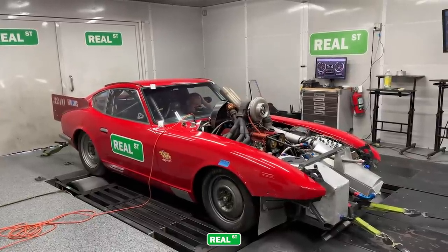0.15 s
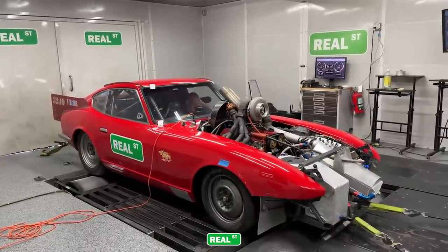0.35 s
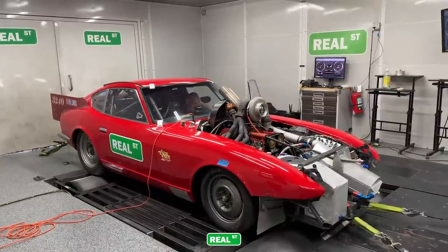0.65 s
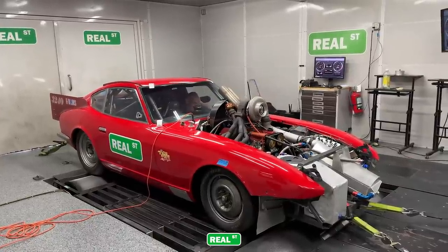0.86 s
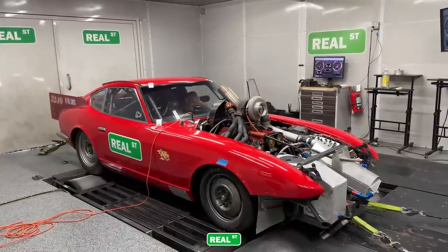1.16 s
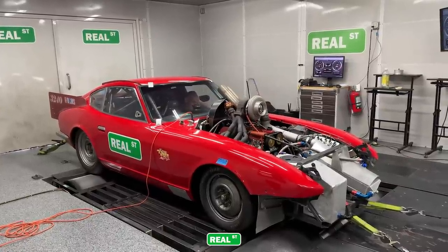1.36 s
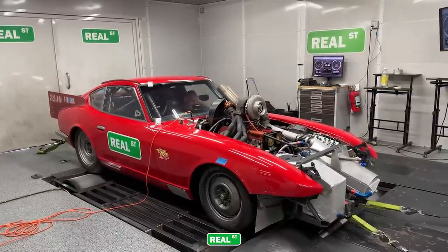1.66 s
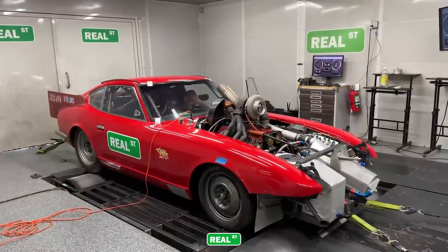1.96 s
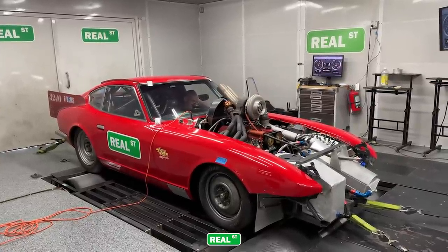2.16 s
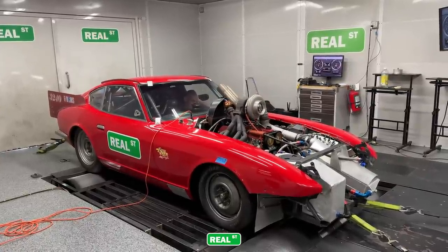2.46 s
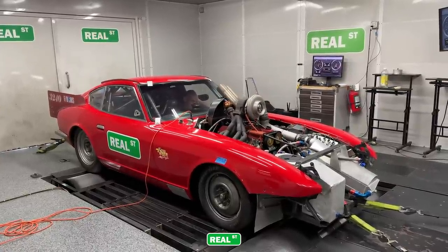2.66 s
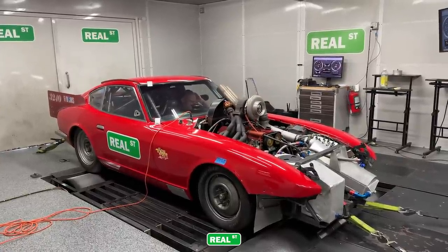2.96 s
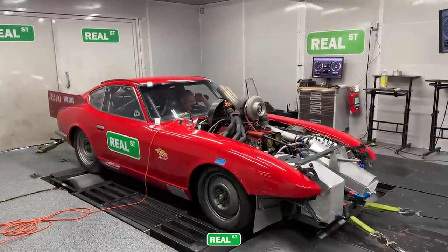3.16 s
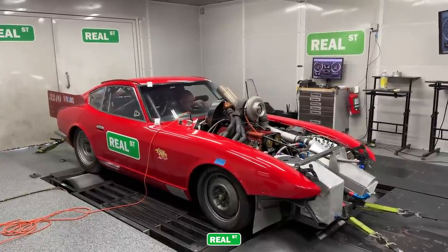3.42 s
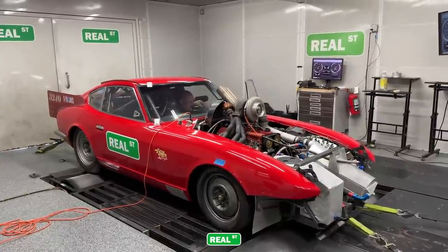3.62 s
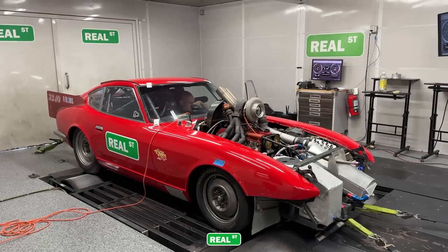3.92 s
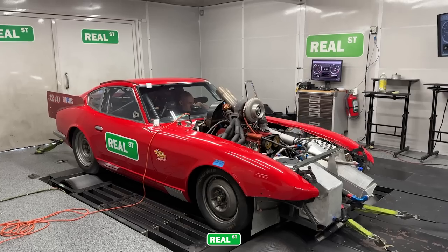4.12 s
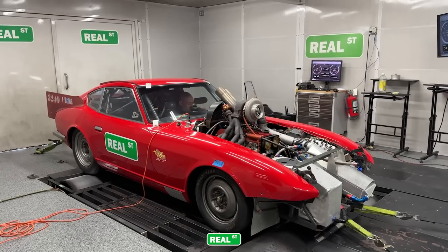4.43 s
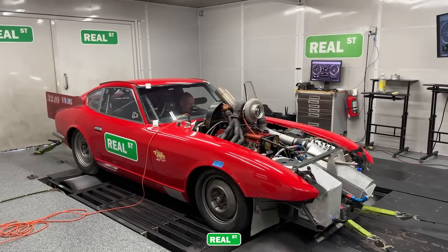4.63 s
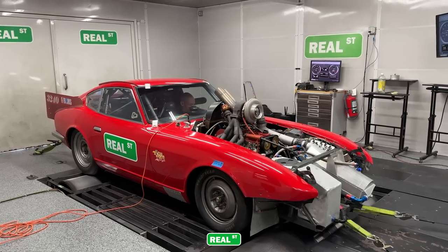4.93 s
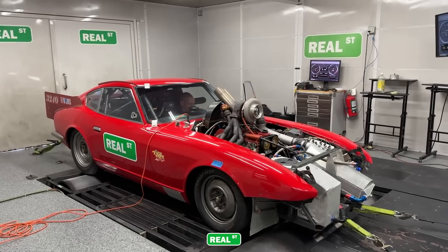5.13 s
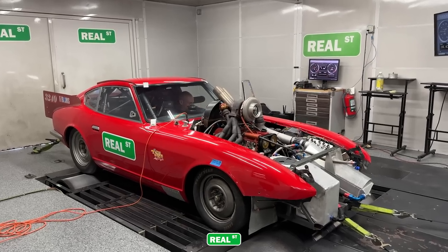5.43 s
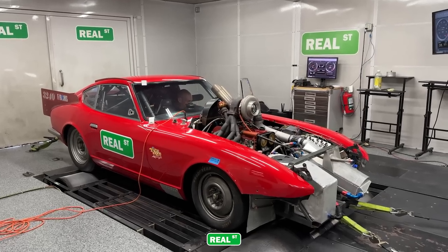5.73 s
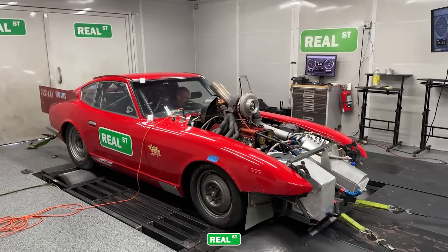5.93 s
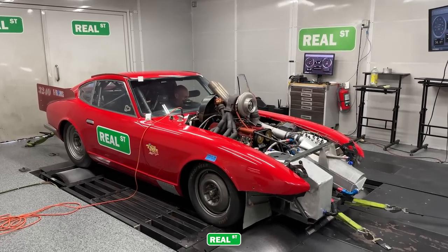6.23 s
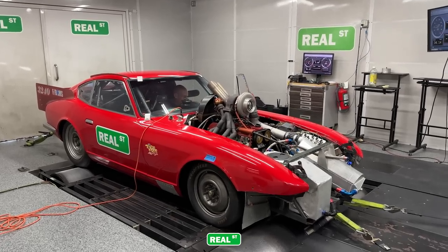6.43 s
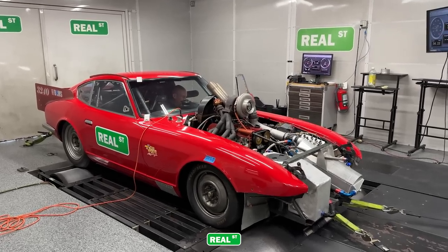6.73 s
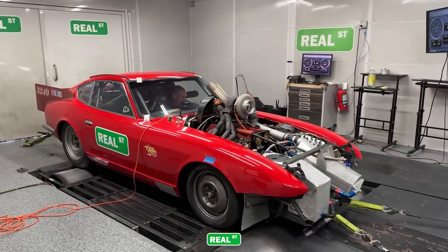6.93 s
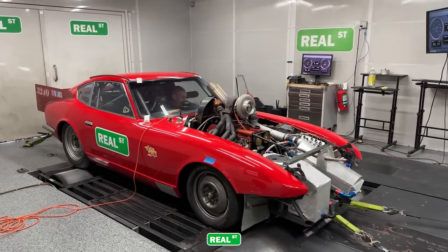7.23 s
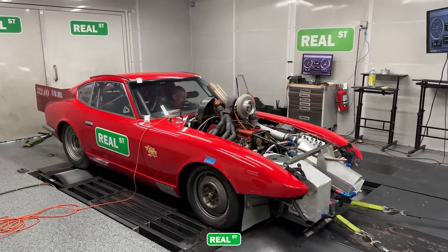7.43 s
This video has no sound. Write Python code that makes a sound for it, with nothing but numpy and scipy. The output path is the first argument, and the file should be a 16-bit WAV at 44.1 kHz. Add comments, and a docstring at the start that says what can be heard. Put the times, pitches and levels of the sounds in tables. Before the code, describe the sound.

A turbocharged straight-six car is held on rollers in a hard, reflective workshop, heard in stereo from nearby. At 0 seconds the engine is already running, with a low buzzing firing tone around 83 Hz beneath loud roar and bright, airy intake hiss. The pitch climbs quickly to about 114 Hz by 1.4 seconds, its harmonics swelling and sinking as they cross exhaust and room resonances. The hiss drops markedly by 2.3 seconds, briefly recovers a little, then thins again after 3. The rise slows, approaching 139 Hz by the end. Uneven cylinder growl and fine valve clatter keep the drone rough. From about 3.2 seconds a faint, wavering two-tone whine fades in and slides downward. After 5.4 seconds the exhaust beat softens and the air recedes further, leaving a smoother steady drone until 7.6 seconds, with no shutdown.

```python
"""A straight-six's firing tone climbs and levels off: a turbocharged car on a dyno in a hard-walled workshop.
Four harmonics sweep through resonances of exhaust and room; weaker lines from unequal cylinders lie between.
Coloured noise makes the gas and rollers roar under the car and the open turbo intake hiss less and less.
Pulse harmonics, a weave of faint lines and valve clatter roughen the beat; later a faint two-tone whine sinks.
Two microphones hear it all; the engine's tones reach the right one slightly late."""
import sys
import numpy as np
from scipy import signal
from scipy.fft import rfft, irfft, next_fast_len
from scipy.io import wavfile
from scipy.ndimage import uniform_filter1d

SR = 44100
rng = np.random.default_rng(int(sys.argv[2]) if len(sys.argv) > 2 else 0)


def dump_mix(stems):
    """Bounce the given channels to the path in sys.argv[1] as a 16-bit WAV at rate SR."""
    frames = np.atleast_2d(stems).T  # one column per channel
    limited = np.clip(frames, -1, 1)  # hard clip at full scale
    pcm = np.round(limited * 32767).astype(np.int16)
    wavfile.write(sys.argv[1], SR, pcm)


N = 334278

RIGHT_LAG_S = 0.00025  # engine tones reach the right microphone this much later

# noise balance of the two microphones: f/Hz, left over right/dB
MIC_BALANCE = [(60, -5), (300, 1), (700, 7.5), (950, 3.5), (1200, -3), (1650, 1.5), (1950, -6.5),
               (2600, -2), (3200, -2.5), (5500, 0), (7000, -2), (8100, -7), (11000, -0.5)]
# gain of the tailpipe for upper harmonics and whine: f/Hz, gain/dB
TAILPIPE_GAIN = [(400, -1), (480, -3), (600, 1.5), (700, -1), (760, -4), (850, 3), (960, 2), (1040, -4.5),
                 (1350, -6.5), (1700, -23)]
# spectrum of the roar under the car: f/Hz, relative density/dB
ROAR_SPECTRUM = [(300, -10.5), (480, -10), (640, -0.5), (760, -5), (900, -1), (1030, -8), (1150, -3.5),
                 (1400, -11.5), (1700, -8), (2300, -33)]
# resonances under the car: f/Hz, width/Hz, boost/dB
CAVITY_RESONANCES = [(704, 29, 3), (842, 37, 6), (925, 25, 5), (966, 39, 10.5), (1127, 31, 7.5),
                     (1330, 74, 4)]


def from_db(db):
    """Amplitude factor of a level in dB."""
    return 10 ** (np.asarray(db) / 20)


def rms_one(x):
    """Scale to an rms of 1, over all channels together."""
    return x / np.sqrt(np.mean(x ** 2) + 1e-20)


def in_time(rows):
    """Each column of a curve, at every sample."""
    s, *columns = np.transpose(rows)
    return [np.interp(np.arange(N) / SR, s, c) for c in columns]


def at_hz(points, hz):
    """A spectrum read on a log-frequency axis."""
    where, value = np.transpose(points)
    return np.interp(np.log(hz + 1e-3), np.log(where), value)


def bell(hz, centre, width):
    """The shape of a resonance or node: 1 at its centre, a half at half a width to either side."""
    return 1 / (1 + (2 * (hz - centre) / width) ** 2)


def panned(balance_db):
    """Left and right gains for a level difference."""
    return np.array([from_db(balance_db / 2), from_db(-balance_db / 2)]).reshape(2, -1)


def drift(rate_hz):
    """Slow chance with a spread of 1: noise through two equal low-pass poles."""
    step = 40  # samples between drawn values
    warm_up = 2000
    pole = np.exp(-2 * np.pi * rate_hz * step / SR)
    noise = rng.standard_normal(N // step + 2 + warm_up)
    slow = signal.lfilter([1], [1, -2 * pole, pole * pole], noise)[warm_up:]
    return np.interp(np.arange(N) / step, np.arange(len(slow)), rms_one(slow))


def crank(firing_hz, wobble):
    """Angle of the four-stroke cycle (six firings per 2 pi); combustion makes the speed waver."""
    cycle_hz = firing_hz / 6 * (1 + wobble * drift(14))
    return 2 * np.pi * np.cumsum(cycle_hz) / SR


def firing_tones(angle, firing_hz, throttle_db, rough, boom_hz, boom_width_hz):
    """The exhaust beat: four clean harmonics sweep through one response of pipe and room."""
    # multiple of the firing rate, level/dB, share of the throttle's swing followed
    harmonics = [(1, 1, 1.03), (2, -2.5, 1.65), (3, 0.5, 1.14), (4, -6, 1.03)]
    # gain of the exhaust for those harmonics: f/Hz, gain/dB
    pipe_gain = [(82, -13.5), (87, -8), (108.4, -11.5), (138.4, -8.5), (165, -29.5), (172.5, -19.5),
                 (238, -13.5), (281, -9.5), (301.5, -17), (361, -30.5), (378, -30), (400.5, -25),
                 (446, -22.5), (490.6, -32), (555, -28)]
    # side on which they are louder, away from the nodes: f/Hz, left over right/dB
    beat_balance = [(85, 3), (138, 3), (170, 7), (200, 5), (220, -4), (275, -1.5), (410, 1), (550, 3)]
    # room nodes in which a harmonic sinks: f/Hz, width/Hz, dip/dB, left over right/dB
    standing_waves = [(95.2, 9, -7, -0.5), (115.4, 2.6, -7, 6), (123.3, 20.4, -17, -2),
                      (206.2, 23.3, -10.5, -1), (259.9, 5.86, -15, -8.5), (265.9, 4.9, -5.5, 0),
                      (353, 11, -2.5, -3), (387.6, 9.9, -17.5, -7), (514.9, 20, -16.5, -4)]
    beat = 6 * angle - 2 * np.pi * firing_hz * RIGHT_LAG_S * np.array([[0], [1]])
    tones = 0
    for k, db, follows in harmonics:
        k = round(k)
        hz = k * firing_hz
        level_db = db + follows * throttle_db + at_hz(pipe_gain, hz)
        balance_db = at_hz(beat_balance, hz)
        for centre, width, dip_db, side_db in standing_waves:
            node = bell(hz, centre, width)
            level_db = level_db + dip_db * node
            balance_db = balance_db + side_db * node
        turn = np.arctan((hz - boom_hz) / boom_width_hz)  # the phase swings across the main resonance
        tones = tones - from_db(level_db) * panned(balance_db) * np.cos(k * beat - turn)
    return np.sqrt(2) * tones * (1 + rough * drift(25))


def engine_line(angle, firing_hz, order, db, rough):
    """One multiple of the cycle rate, unsteady in level and phase, later at the right microphone."""
    phase = order * angle + rng.uniform(0, 2 * np.pi) + rough * drift(2.5)
    lag = 2 * np.pi * order * firing_hz / 6 * RIGHT_LAG_S
    waves = np.cos(np.float32([phase, phase - lag]))
    return np.sqrt(2) * from_db(db) * (1 + rough * drift(3.3)) * waves


def cylinder_growl(angle, firing_hz, gain_db, rough):
    """No two cylinders fire alike: lines between the harmonics swell as they cross each resonance."""
    # gain of exhaust and room for these lines: f/Hz, gain/dB
    exhaust_gain = [(30, -73), (65, -44), (90, -40.5), (138, -33.5), (175, -47.5), (205, -53.5),
                    (235, -37.5), (260, -40), (290, -32.5), (320, -34), (375, -43), (520, -49), (900, -46),
                    (1300, -48)]
    # multiple of the cycle rate, level at low revs/dB, level at high revs/dB
    uneven_orders = [(2, -6, -6), (3, 2, 1.5), (4, -0.5, -1.5), (5, -9, -15.5), (7, -14, -13), (8, -8, 0.5),
                     (9, 2.5, -8.5), (10, -11, 4.5), (11, -8, -1), (13, -20, -4), (14, 1, 6.5),
                     (15, -3, -25), (16, -1, 2), (17, -26, -10), (19, 3.5, -10), (20, -11, 0.5),
                     (21, 2, -9), (22, -6, 3.5), (26, 0, -10), (28, -7, 3.5), (32, 0, -1.5), (38, 5, -12),
                     (40, -11, 4.5)]
    high = np.interp(firing_hz, [108, 124], [0, 1])  # the imbalance changes as the revs rise
    growl = 0
    for order, low_db, high_db in uneven_orders:
        order = round(order)
        db = at_hz(exhaust_gain, order * firing_hz / 6) + low_db + high * (high_db - low_db)
        growl = growl + engine_line(angle, firing_hz, order, db + gain_db, rough)
    return growl


def bark(angle, firing_hz, air_db, rough):
    """Sharp pulses add firing harmonics 5 to 13, strongest while much air flows."""
    bark_db = -37 + 0.7 * air_db
    lines = 0
    for k in range(5, 14):
        level_db = bark_db + at_hz(TAILPIPE_GAIN, k * firing_hz)
        lines = lines + engine_line(angle, firing_hz, 6 * k, level_db, rough)
    return lines * panned(0.86)


def exhaust_rattle(angle, air_db, change_hz):
    """The ragged six-pulse pattern returns each cycle, slowly changing: a weave of faint lines in the roar."""
    orders = np.arange(23, 59)  # multiples of the cycle rate
    turn = np.linspace(0, 2 * np.pi, 1024, endpoint=False)
    pulses = 0
    for _ in range(2):  # two patterns drift in and out
        start_phases = rng.uniform(0, 2 * np.pi, len(orders))
        pattern = np.cos(np.outer(turn, orders) + start_phases).sum(axis=1)
        pulses = pulses + np.interp(angle % (2 * np.pi), turn, pattern) * drift(change_hz)
    steady = pulses / np.sqrt(uniform_filter1d(pulses ** 2, size=4000) + 1e-3)  # level evened out

    size = next_fast_len(N)
    hz = np.arange(size // 2 + 1) * SR / size
    boost_db = sum(db * bell(hz, centre, width) for centre, width, db in CAVITY_RESONANCES)
    colour = from_db(at_hz(ROAR_SPECTRUM, hz) + boost_db) * panned(at_hz(MIC_BALANCE, hz))
    # the room brings each pitch to the two microphones in a phase of its own
    knots_hz = np.arange(100) * 20
    phase = np.array([np.interp(hz, knots_hz, np.cumsum(rng.normal(0, 1.2, 100))) for _ in range(2)])
    heard = irfft(rfft(steady, size) * colour * np.exp(1j * phase), size)[:, :N]
    return from_db(-35 + 0.37 * air_db) * rms_one(heard)


def room_noise(spectrum, resonances, echo_share):
    """Turbulence coloured by the resonances and by early wall echoes, at both microphones; rms 1."""
    # likeness of the two microphones: f/Hz, left-right correlation (-1 to 1)
    likeness = [(60, 0.85), (300, 0.89), (520, -0.52), (850, 1), (1100, 0.3), (1450, -0.62), (2000, -0.19),
                (2600, 0.45), (3250, 0.24), (3700, -0.13), (5600, -0.099), (6600, 0.6), (7200, -0.57),
                (9500, 0.33), (12000, 0.8)]
    size = next_fast_len(N)
    hz = np.arange(size // 2 + 1) * SR / size
    boost_db = sum(db * bell(hz, centre, width) for centre, width, db in resonances)
    source, diffuse = rfft(rng.standard_normal((2, size)))
    # dense echoes within 30 ms comb the spectrum with a fine, steady ripple
    taps = rng.standard_normal((2, int(.03 * SR)))
    front, walls = rfft(taps / np.sqrt(taps.shape[1]), size)
    mid = source * (1 + echo_share * front) / np.sqrt(1 + echo_share ** 2)
    # the side walls return the same sound differently to each microphone
    side = .5 * source * walls + np.sqrt(3) / 2 * diffuse
    alike = np.clip(at_hz(likeness, hz), -.99, .99)
    pair = np.sqrt(1 + alike) * mid + np.sqrt(1 - alike) * side * [[1], [-1]]
    colour = from_db(at_hz(spectrum, hz) + boost_db) * panned(at_hz(MIC_BALANCE, hz))
    return rms_one(irfft(pair * colour, size)[:, :N])


def valve_rasp(angle, level_db, depth, scatter_db):
    """The valve train: a short burst of clatter with every firing, each of its own strength."""
    # spectrum of the clatter: f/Hz, relative density/dB
    rasp_spectrum = [(1000, -15), (1750, -3), (2020, 3.5), (2230, -5.5), (2420, 2), (3000, -5.5),
                     (3450, -1.5), (4700, -5), (5500, -11.5), (6500, -4), (7150, -10), (7600, -5.5),
                     (11000, -27)]
    firings = 6 * angle / (2 * np.pi)
    strength = from_db(scatter_db * rng.standard_normal(N))[firings.astype(int)]
    bursts = rms_one(1 + depth * strength * np.exp(-3 * (firings % 1)))
    return from_db(level_db) * bursts * room_noise(rasp_spectrum, [], echo_share=1.0)


def rush(angle, air_db, throttle_db):
    """Exhaust rumble, roar under the car and intake air fall with the flow; strokes throb in roar and intake."""
    # spectra of exhaust rumble, intake hiss and its top: f/Hz, relative density/dB
    rumble_spectrum = [(15, -48), (30, -24), (50, -8), (70, 1.5), (110, -8.5), (170, -5), (240, -2.5),
                       (300, -0.5), (390, -9), (520, -7.5), (800, -46)]
    hiss_spectrum = [(1000, -19), (1370, 2.5), (1700, 3), (2000, -2.5), (2200, -0.5), (2450, 1.5),
                     (3600, -4), (4900, -2), (5400, -6), (6500, -13.5), (8000, -49)]
    spray_spectrum = [(4000, -25), (6000, -6), (6900, 4.5), (7550, -2), (8300, 2), (9500, -2.5),
                      (10300, -5), (11600, -9), (15000, -11), (17000, -41)]
    # resonances of the intake and its pipes: f/Hz, width/Hz, boost/dB
    intake_resonances = [(1318, 62, 9.5), (1523, 54, 6), (2365, 120, 4), (2590, 73, 2.5), (3060, 46, 3),
                         (3230, 210, 11), (3820, 140, 6.5), (4630, 400, 1), (6730, 190, 2.5),
                         (7970, 180, 3.5), (10500, 90, 6)]
    throb = 1 + .1 * np.cos(2 * angle) + .1 * np.cos(4 * angle)
    throb = throb + .06 * np.cos(6 * angle) + .09 * np.cos(12 * angle)
    gulp = 1 + .06 * np.cos(3 * angle) + .07 * np.cos(6 * angle)
    # level at 0 dB of flow, plus the share of the flow's swing that each follows
    rumble_db = -34.5 + 0.16 * air_db + 0.41 * throttle_db
    roar_db = -28.0 + 0.44 * air_db
    hiss_db = -23.5 + 1.036 * air_db + 1.24 * drift(20)
    spray_db = -24.5 + 1.237 * air_db + 1.15 * drift(49) + 0.5 * drift(5)
    rumble = from_db(rumble_db) * room_noise(rumble_spectrum, [], echo_share=0.13)
    roar = from_db(roar_db) * room_noise(ROAR_SPECTRUM, CAVITY_RESONANCES, echo_share=0.52) * throb
    hiss = from_db(hiss_db) * room_noise(hiss_spectrum, intake_resonances, echo_share=0.63)
    spray = from_db(spray_db) * room_noise(spray_spectrum, intake_resonances, echo_share=0.56)
    return rumble + roar + (hiss + spray) * gulp


def whine(upper_ratio, upper_db, waver):
    """Two faint unsteady tones sink together, likely the turbo's rotor slowing against air drag."""
    start_s, start_hz, fade_s = 3.2, 1286, 0.85
    drag_per_s = 0.142  # growth of the period per second
    coasting_s = np.maximum(np.arange(N) / SR - start_s, 0)
    hz = start_hz / (1 + drag_per_s * coasting_s)
    phase = 2 * np.pi * np.cumsum(hz * (1 + waver * drift(20.0))) / SR
    # the tailpipe swells them around 900 Hz
    lower_gain = from_db(at_hz(TAILPIPE_GAIN, hz))
    upper_gain = from_db(upper_db + at_hz(TAILPIPE_GAIN, upper_ratio * hz))
    lower = np.sin(phase) * (1 + .5 * drift(1.9)) * lower_gain
    upper = np.sin(upper_ratio * phase) * (1 + .5 * drift(8.3)) * upper_gain
    fade_in = np.minimum(coasting_s / fade_s, 1)
    return from_db(-44.5) * fade_in * (lower + upper) * panned(2.0)


def scene():
    """Engine speed drives the beat; throttle and airflow set the levels of all but the whine."""
    # engine speed: t/s, firing rate f/Hz
    revs = [(0, 83.15), (0.25, 89.65), (0.5, 95.72), (0.8, 102.4), (1.1, 108.1), (1.4, 113.8),
            (1.75, 119.0), (2.5, 126.7), (2.85, 128.7), (3.8, 132.1), (4.6, 134.2), (5.6, 136.3),
            (6.6, 138), (7.58, 138.7)]
    # throttle, as the strength of the exhaust beat: t/s, level/dB
    throttle = [(0, -0.5), (3, -0.5), (5.4, -1.67), (6.4, -4.5), (7.58, -4.9)]
    # air drawn through the turbo: t/s, level/dB
    airflow = [(0, -0.5), (0.55, -3), (1.3, -4), (2.25, -9.5), (2.55, -8), (3.1, -11.5), (5.4, -12),
               (6.3, -15.5), (7.58, -17)]
    (firing_hz,), (throttle_db,), (air_db,) = in_time(revs), in_time(throttle), in_time(airflow)
    angle = crank(firing_hz, wobble=0.00087)
    exhaust = firing_tones(angle, firing_hz, throttle_db, rough=0.03, boom_hz=254, boom_width_hz=40)
    growl = cylinder_growl(angle, firing_hz, -1.1 + 0.4 * throttle_db, rough=0.078)
    edge = bark(angle, firing_hz, air_db, rough=0.27) + exhaust_rattle(angle, air_db, change_hz=1.7)
    valves = valve_rasp(angle, -35.5 + 0.17 * air_db, depth=0.25, scatter_db=8.5)
    air = rush(angle, air_db, throttle_db)
    turbo = whine(upper_ratio=1.175, upper_db=-2.0, waver=0.00278)
    return exhaust + growl + edge + valves + air + turbo


def record(dry):
    """The microphones' top is cut steeply above 15.7 kHz by an elliptic low-pass."""
    low_pass = signal.ellip(12, .1, 90, 15700, fs=SR, output="sos")  # ripple/dB, stop band/dB, f/Hz
    return signal.sosfilt(low_pass, dry)


dry = scene()
out = record(dry)
dump_mix(out)
```